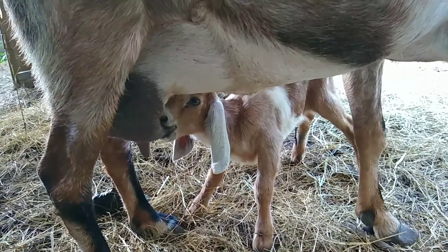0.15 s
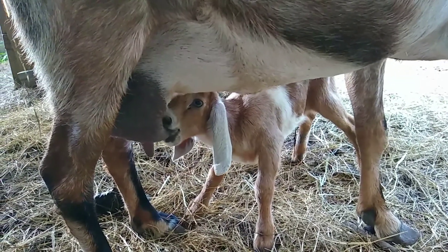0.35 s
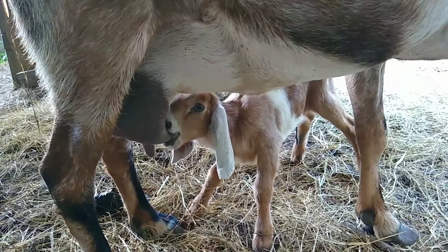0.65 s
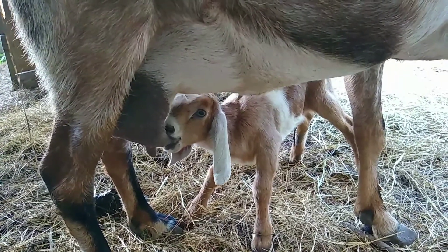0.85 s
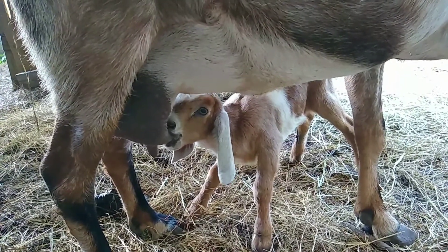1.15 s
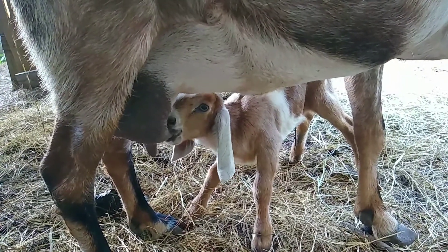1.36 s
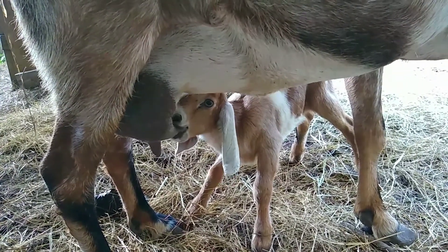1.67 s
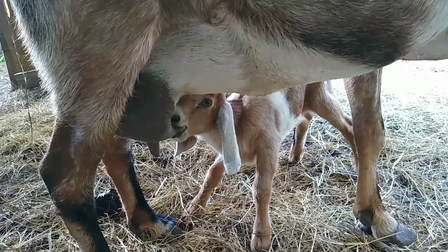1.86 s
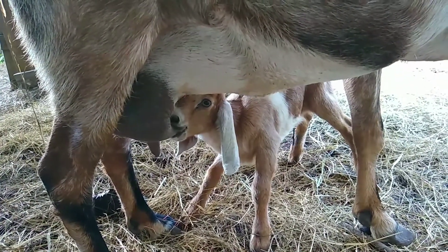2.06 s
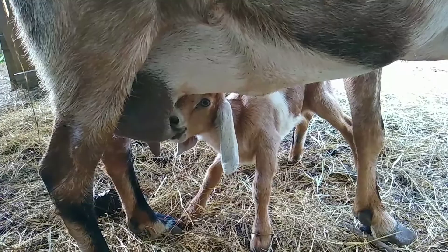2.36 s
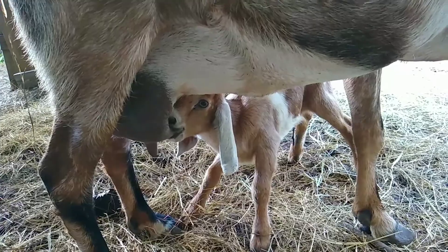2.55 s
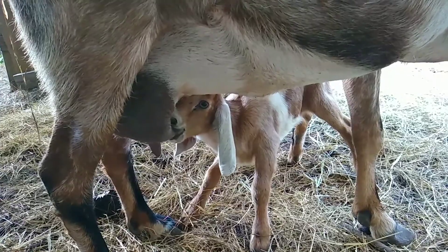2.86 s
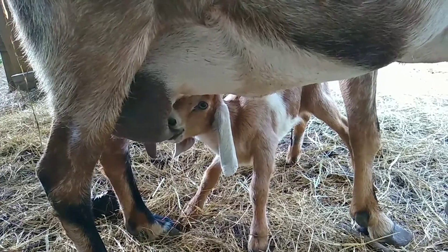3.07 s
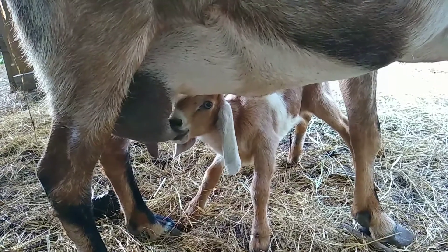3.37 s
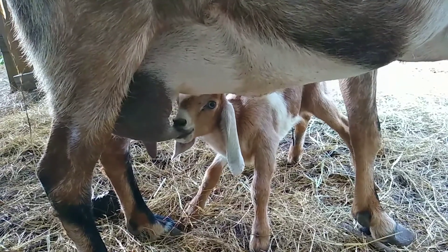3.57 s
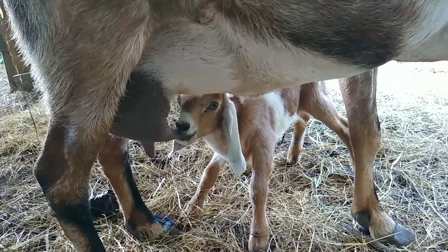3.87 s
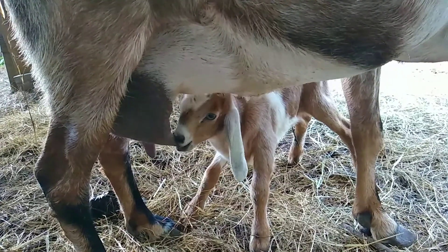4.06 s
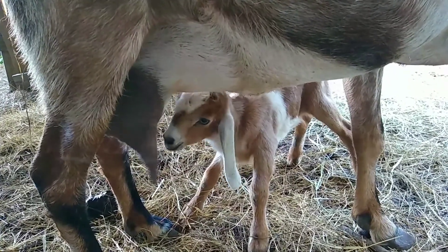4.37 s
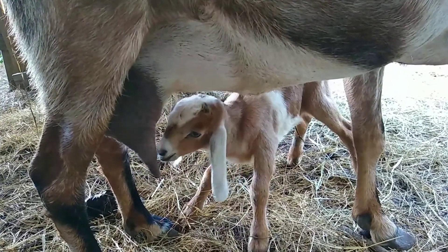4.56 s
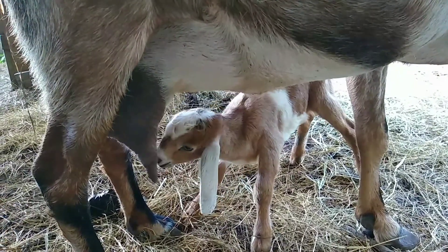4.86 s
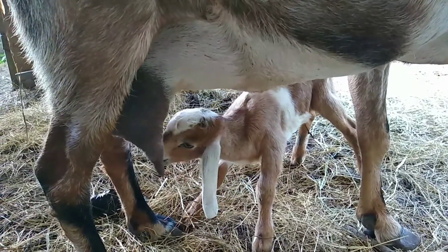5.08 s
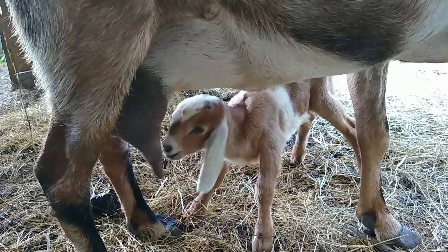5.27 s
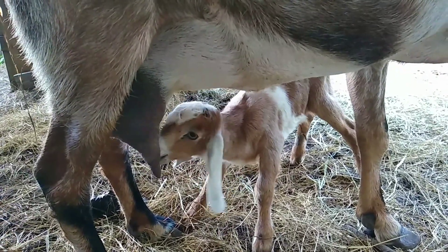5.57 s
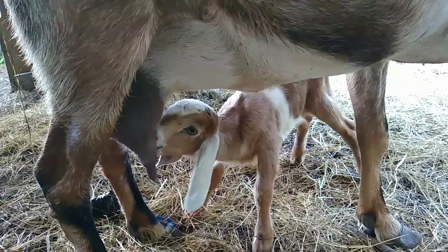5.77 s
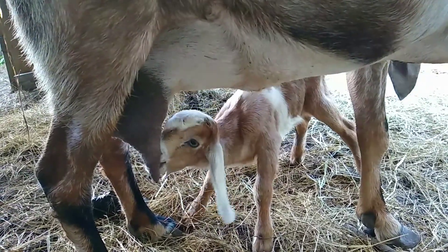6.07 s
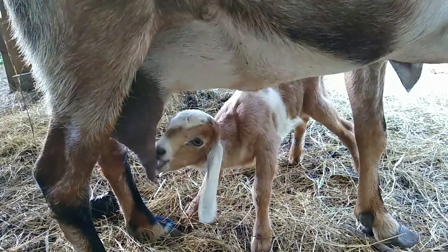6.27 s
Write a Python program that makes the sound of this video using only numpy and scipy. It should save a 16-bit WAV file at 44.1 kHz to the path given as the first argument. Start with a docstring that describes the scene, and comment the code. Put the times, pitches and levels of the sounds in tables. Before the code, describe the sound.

Near stereo microphones catch hooves shuffling and stalks snapping over very faint low air. The kid squeals high and harsh, its voice cracking into rasp; metal is bumped softly. After a calmer stretch of straw rustle, lip squeaks, gulps and two soft murmured bleats, it squeals again, shrill and wavering, over thudding, crunching straw. Short barn echoes follow the voice.

```python
"""A newborn goat kid nurses on straw in a barn: sucking squeaks, gulps and hooves in coloured noise.
At 1.35 s a shrill squeal: coupled tones mix into sum and difference tones and break up into a rasp.
A metal knock follows at 1.87 s (damped sines), then, amid sucking, two faint low bleats from 3.6 s (pulses
through throat and mouth resonances). From 5.7 s a second squeal; near 6.3 s a scuffle of thud and crunch
noise builds. Stirred straw and faint moving air (noise) run throughout; the barn echoes all but that air."""
import sys
import numpy as np
from scipy import signal
from scipy.fft import rfft, irfft, next_fast_len
from scipy.io import wavfile
from scipy.ndimage import map_coordinates

SR = 44100
rng = np.random.default_rng(int(sys.argv[2]) if len(sys.argv) > 2 else 0)


def int16_out(signal):
    """Quantize to a 16-bit WAV file."""
    q = np.round(np.clip(np.atleast_2d(signal).T, -1, 1) * 32767)
    wavfile.write(sys.argv[1], SR, q.astype(np.int16))


N = 283361
TIME = np.arange(N) / SR  # s

# Faint moving air. Each row: frequency in Hz, relative level in dB.
RUMBLE_HZ_DB = [(20, -41.5), (38, -32.5), (55, -16), (90, 1.0), (180, -3.5), (400, -14), (1500, -33)]
# Bedding stirred by the animals. Each row: time in seconds, shuffle level in dB, rustle level in dB.
STIR_S_DB = [(.25, -68, -70), (.5, -63, -67), (1.1, -58.5, -67.5), (1.6, -63, -62.5), (1.95, -54, -68),
             (2.25, -60.5, -64.5), (3.4, -60.5, -66.5), (4.6, -63.5, -69), (5.05, -65, -72.5),
             (5.4, -59, -70.5), (5.65, -60.5, -67), (6.0, -54.5, -59.5)]
# Noise spectra of straw and hooves. Each row: frequency in Hz, relative level in dB.
SHUFFLE_HZ_DB = [(15, -61), (25, -40), (78, -2.5), (124, -5.5), (168, 1), (221, -1.5), (324, -1),
                 (433, -3.5), (834, -4), (1250, -8.5), (1670, -7), (2060, -24), (2500, -46), (3250, -58),
                 (5500, -120)]
RUSTLE_HZ_DB = [(40, -20), (1200, 3.5), (1800, 11), (2200, -6), (2800, 5), (5700, 2), (7500, -17.5),
                (10000, -22.5), (15000, -19.5)]
CRACKLE_HZ_DB = [(1200, 3), (2200, -1), (2900, 11), (5700, 3), (7500, -16), (10000, -27), (15000, -17.5)]
CHAFF_HZ_DB = [(3000, -39.5), (7500, 3), (9000, -8.5), (10500, -0.5), (12000, -10), (13800, 3.5),
               (15500, -5.5)]
THUD_HZ_DB = [(30, -44.5), (60, -21.5), (180, 1.5), (400, 3.5), (800, -20.5), (2000, -63)]
CRUNCH_HZ_DB = [(40, -44.5), (250, -16), (800, 4.5), (1400, -1.5), (2200, -12.5), (5000, -50)]
# Closing scuffle: time half under way, build-up time, level.
SCUFFLE_S, SCUFFLE_RISE_S, SCUFFLE_DB = 6.305, 0.02, -34
# Steps and nudges in the straw. Each row: start in seconds, levels of thud, crunch, crackle and chaff
# in dB, rise time in seconds.
STEPS = [(.43, -68, -49, -54, -62, 0.0057), (0.556, -77, -52.5, -49, -58, 0.0013),
         (0.696, -59, -47.5, -51, -64.5, .008), (0.74, -58, -50, -53.5, -65, 0.0026),
         (0.863, -43, -41.5, -50, -66, 0.0021), (0.895, -40.5, -36, -56.5, -64, 0.0016),
         (0.948, -43, -50, -48.5, -67.5, 0.0055), (1.225, -53, -50.5, -54, -71, 0.00082),
         (1.255, -60, -45, -43.5, -56.5, 0.023), (1.279, -62, -44, -49, -61, .006),
         (1.874, -38, -41.5, -42, -48.5, 0.0027), (2.225, -47.5, -51.5, -57, -66.5, 0.0016),
         (2.494, -56, -55.5, -59.5, -73, 0.0014), (4.783, -50, -51.5, -60, -82, 0.0085),
         (5.229, -46, -59, -73, -80, 0.0018), (5.395, -56.5, -54, -64, -79, 0.0072),
         (5.688, -44, -44, -60.5, -76, 0.0079), (5.775, -53, -48, -56, -70.5, .002)]
KNOCK_S, KNOCK_DB = 1.873, -50
# Ringing metal. Each row: frequency in Hz, level in dB relative to KNOCK_DB, t60 in seconds.
METAL_MODES = [(3015, -5, .35), (5000, -18, .35), (5340, -14, .35), (5910, -6, .17), (7970, -17, .3),
               (14690, -3, .15)]
# Snaps of stalks and lips. Each row: start in seconds, level in dB, pitch in Hz.
SNAPS = [(0.431, -42, 2790), (0.444, -55, 11500), (0.483, -40.5, 3700), (.744, -45, 2900),
         (1.025, -32.5, 4200), (3.028, -53, 5480), (3.289, -42.5, 3300), (3.346, -46, 3050),
         (3.528, -51, 3400), (4.089, -48.5, 2600), (4.971, -53.5, 2580), (5.13, -55, 2600)]
# Snap spectrum. Each row: frequency in Hz, relative level in dB.
SNAP_HZ_DB = [(150, -15), (2000, -5.5), (3100, 1), (6000, -3.5), (9000, -19), (16000, -18.5)]
# Gulps and smacks of the muzzle. Each row: start in seconds, level in dB, pitch in Hz.
GULPS = [(.194, -35, 740), (2.46, -37.5, 258), (3.289, -34, 704), (3.528, -36.5, 800), (3.612, -36, 362),
         (4.052, -41.5, 196.5), (4.085, -38, 422), (4.274, -38, 460), (4.971, -40.5, 336),
         (5.129, -44, 357), (5.228, -40.5, 180), (5.947, -36.5, 258), (6.084, -37, 290)]
GULP_T60_PERIODS, GULP_TICK_DB = 12.1, -16  # tick relative to the gulp's level
# Sucking squeaks, then thin squeaks of the lips. Each row: centre in seconds, pitch in Hz, level in dB,
# length (between 1/e points) in seconds.
SUCKS = [(0.135, 853, -47, 0.05), (0.44, 815, -48.5, 0.061), (2.911, 833, -53, .09),
         (3.204, 782, -51, 0.06), (3.462, 841.6, -40, 0.0522), (3.734, 818, -44.5, 0.1)]
LIP_SQUEAKS = [(4.115, 3770, -62, 0.027), (5.008, 2900, -67, .015), (5.158, 2910, -62, 0.024),
               (5.335, 3060, -61, 0.025)]
# Glide through a squeak and lift at its strongest, as shares of the pitch.
SUCK_RISE, SUCK_ARCH = 0.056, 0.094
LIP_RISE, LIP_ARCH = -0.039, 0.06
# Soft bleats, one list per call. Each row: time in seconds, pitch in Hz, level in dB, lower and upper
# mouth resonance in Hz, roughness from 0 to 1.
SOFT_BLEATS = [
    [(3.58, 183.1, -59, 1350, 1650, 0.66), (3.65, 192, -51, 1430, 1740, 0.57),
     (3.69, 205, -56.5, 1050, 1610, 0.53), (3.73, 234.2, -51, 1100, 1520, 0.36),
     (3.78, 240.5, -48.5, 1170, 1550, 0.18), (3.87, 235, -47.5, 1420, 1890, 0.17),
     (3.93, 215.5, -49.5, 1330, 1760, 0.47), (3.96, 194.2, -54.5, 1280, 1700, 0.53),
     (3.995, 190.5, -67, 1280, 1650, .8)],
    [(4.22, 189.3, -61.5, 1400, 1650, 0.78), (4.29, 205.7, -50, 1390, 1810, 0.81),
     (4.33, 216, -50, 1330, 1800, 0.16), (4.39, 224.2, -51.5, 1340, 1950, 0.28),
     (4.43, 221.8, -52, 1350, 1750, 0.65), (4.46, 224, -64, 1350, 1370, 0.45),
     (4.51, 222, -66, 1340, 1326, .2)],
]
# Throat response. Each row: frequency in Hz, relative level in dB.
THROAT_HZ_DB = [(100, -31), (225, 4), (450, 1), (680, -8), (1200, -0.5), (1750, 1), (2500, -9), (3100, -8),
                (3650, -1.5), (4000, -2.5), (4700, -13), (5700, -5), (6700, -34.5), (7600, -11.5),
                (10000, -59)]
DULL_PER_KHZ = 0.29  # dB of treble lost per kHz, per dB that a soft bleat weakens
# Main tone of each squeal. Each row: time in seconds, pitch in Hz, level in dB.
SQUEAL_1 = [(1.365, 3150, -53), (1.41, 3220, -47.5), (1.44, 3200, -51.5), (1.452, 3200, -30),
            (1.478, 3170, -36.5), (1.5, 3015, -31.5), (1.55, 3140, -32.5), (1.574, 2930, -25),
            (1.597, 3130, -20.5), (1.604, 3150, -28.5), (1.63, 3190, -25.5), (1.656, 3023, -16),
            (1.672, 3012, -18), (1.684, 3100, -25), (1.69, 3400, -31.5), (1.712, 3300, -34.5),
            (1.722, 2885, -22.5), (1.732, 2830, -33), (1.744, 2740, -35.5), (1.752, 2790, -18.5),
            (1.764, 3014, -19), (1.78, 3020, -26.5), (1.792, 3250, -30.5), (1.803, 3330, -39)]
SQUEAL_2 = [(5.83, 3030, -40.5), (5.848, 3137, -29.5), (5.872, 3200, -22), (5.888, 3117, -32.5),
            (5.9, 2993, -24), (5.912, 3020, -28), (5.93, 3026, -28), (5.95, 3280, -23),
            (5.975, 3118, -29.5), (6.015, 3182, -30.5), (6.038, 3105, -35.5), (6.058, 3163, -22.5),
            (6.08, 3181, -22.5), (6.088, 3400, -37), (6.115, 3360, -32.5), (6.124, 3110, -29),
            (6.143, 2970, -25), (6.152, 3042, -32.5), (6.165, 3170, -17.5), (6.187, 3400, -31.5),
            (6.24, 3382, -27), (6.256, 3165, -25.5), (6.276, 3140, -34.5), (6.29, 3078, -22.5),
            (6.303, 3160, -24), (6.31, 3380, -36), (6.35, 3480, -34.5), (6.372, 3592, -24.5),
            (6.425, 3540, -33.5)]
# Strain of the voice in each squeal. Each row: time in seconds, roughness from 0 to 1.
STRAIN_1 = [(1.36, .03), (1.48, .05), (1.51, .14), (1.595, .17), (1.612, .8), (1.635, .6), (1.65, .16),
            (1.68, .16), (1.695, .85), (1.712, .7), (1.722, .2), (1.738, .55), (1.755, .1), (1.775, .2),
            (1.8, .55)]
STRAIN_2 = [(5.88, .08), (5.915, .28), (5.98, .07), (6.07, .04), (6.14, .16), (6.18, .1), (6.21, .3),
            (6.29, .15), (6.33, .5), (6.37, .3), (6.42, .55)]
# Second tone under the main one, early in the first squeal. Each row: time in seconds, pitch in Hz,
# level in dB.
SECOND_TONE = [(1.385, 2810, -50), (1.4, 2555, -34.5), (1.428, 2420, -34), (1.445, 2520, -45),
               (1.47, 2704, -46), (1.56, 2770, -42)]
# High whistles over the main tone, low undertones beneath it. Each row: start in seconds, hold in seconds,
# pitch in Hz, level in dB, scoop as a share of the pitch.
WHISTLES = [(1.351, 0.22, 4510, -20.5, 0.028), (1.6, 0.11, 4190, -38.5, .05),
            (1.702, 0.014, 4590, -22.5, .05), (5.703, 0.024, 4428, -29.5, .12), (5.82, 0.015, 3980, -32, 0),
            (6.192, 0.054, 4440, -38.5, .02), (6.312, .035, 4640, -29.5, 0)]
UNDERTONES = [(1.368, 0.061, 1250, -46.5, 0), (1.449, 0.017, 1295, -18.5, .02),
              (1.5, 0.11, 1409, -29.5, .05), (1.617, 0.039, 1294, -25.5, 0.06),
              (1.717, 0.026, 1402, -30, 0.061), (5.836, 0.013, 913, -30, 0), (5.878, 0.0055, 902.5, -40, 0),
              (6.198, 0.019, 1049, -24, 0.00099), (6.242, 0.02, 1188, -27.5, .1),
              (6.314, 0.042, 1249, -22, .03)]
ATTACK_S, RELEASE_DB_PER_S, SCOOP_S = .006, 750, .013  # attack and scoop are time constants
# Each row: how many times whistle, main tone, undertone and second tone enter a partial.
PARTIAL_ORDERS = [(1, 0, 0, 0), (0, 1, 0, 0), (0, 0, 1, 0), (0, 0, 0, 1), (2, 0, 0, 0), (3, 0, 0, 0),
                  (0, 2, 0, 0), (0, 3, 0, 0), (0, 4, 0, 0), (0, 5, 0, 0), (1, 1, 0, 0), (1, 0, 1, 0),
                  (0, 1, -1, 0), (2, 1, 0, 0), (2, 0, 1, 0), (1, 0, 0, 1), (1, 0, 0, -1), (3, 0, 0, -1),
                  (4, 0, 0, -1)]
# Strength of those partials in each squeal, in dB relative to the tones that form them.
PARTIALS_1_DB = [-1.5, 0.5, -1.5, -1.5, -43.5, -23.5, -18, -44.5, -42, -42, -19.5, -22.5, -17.5, -35.5,
                 -32.5, -15, -21, -36, -41.5]
PARTIALS_2_DB = [-1.5, 0.5, -1.5, 0, -54, -32, -16.5, -32, -25.5, -35, -24, -16, -22.5, -36, -18.5]
# One value each for whistle, main tone, undertone and second tone: pitch shake at full strain in Hz,
# pitch flutter without strain in Hz, level where overtones and mixed tones stop growing in dB.
SHAKE_HZ = [90, 230, 230, 230]
FLUTTER_HZ = [8, 12, 25, 30]
SATURATION_DB = [-19, -29.5, -23, -35.5]
# Rasp spectrum. Each row: frequency in Hz, relative level in dB.
RASP_HZ_DB = [(200, -44), (600, -4.5), (850, 7), (1300, 4.5), (2000, -6.5), (2600, -1.5), (3200, 2.5),
              (4000, -6.5), (5000, 6), (6200, -7), (7300, 1.5), (8400, -21.5), (14000, -18), (16000, -31.5)]
RASP_1_DB, RASP_2_DB = -7.5, -2  # at full strain, relative to the tones of each squeal
RASP_POWER = 1.15  # exponent of the strain
# Echoes from the mother's flank, the wall and the roof. Each row: delay in seconds, level in dB.
ECHOES = [(.0085, -20), (.017, -15), (.026, -17)]
# Decay of the barn. Each row: frequency in Hz, t60 in seconds.
BARN_HZ_T60 = [(150, 0.71), (1000, 0.34), (3000, 0.21), (8000, 0.12), (15000, 0.12)]
# Channel balance. Each row: frequency in Hz, left minus right in dB.
LEFT_LEAD_HZ_DB = [(60, -5.5), (150, 8), (300, 4), (700, 1.5), (1300, 1), (3000, 4.5), (4400, -1),
                   (6200, 1.5), (9500, 6.5), (14000, 3)]
TOP_HZ = 15700


def amp(db):
    """Decibels to gain."""
    return 10 ** (np.asarray(db) / 20)


def unit(x):
    """Scale to rms 1."""
    return x / np.sqrt(np.mean(x ** 2) + 1e-20)


def along(points, hz):
    """Interpolate (Hz, value) points on a log frequency axis."""
    f, v = np.transpose(points)
    return np.interp(np.log(hz + 1), np.log(f + 1), v)


def curves(rows):
    """One value per sample for each column after the time."""
    s, *cols = np.transpose(rows)
    return [np.interp(TIME, s, c) for c in cols]


def gate(rows):
    """Open while a table lasts, with short fades outside it."""
    start_s, end_s = rows[0][0], rows[-1][0]
    return np.interp(TIME, [start_s - .006, start_s, end_s, end_s + .01], [0, 1, 1, 0])


def wobble(rate_hz, times=TIME):
    """Smooth random curve through rate_hz knots a second."""
    knots = rng.standard_normal(int(len(times) * rate_hz / SR) + 4)
    return map_coordinates(knots, [times * rate_hz])


def filtered(x, response):
    """Multiply the spectrum of x by a response of frequency."""
    m = next_fast_len(N + 8192)
    hz = np.fft.rfftfreq(m, 1 / SR)
    return irfft(rfft(x, m) * response(hz), m)[..., :N]


def coloured(x, spectrum):
    """x through a (Hz, dB) spectrum, at rms 1."""
    return unit(filtered(x, lambda hz: amp(along(spectrum, hz))))


def noise(spectrum, grain_db):
    """Coloured noise in tiny uneven grains."""
    return coloured(rng.standard_normal(N) * amp(grain_db * wobble(450)), spectrum)


def bursts(times, levels_db, t60, rise):
    """Envelope of blows that rise (one rise time for all, or one each) and decay exponentially."""
    envelope, t = np.zeros(N + SR), TIME[:SR // 2]
    for s, db, rise_s in zip(times, levels_db, np.broadcast_to(rise, len(times))):
        blow = amp(db - 60 * t / t60) * (1 - np.exp(-t / rise_s))
        envelope[round(s * SR):][:len(t)] += blow
    return envelope[:N]


def rumble():
    """Faint moving air: low noise, independent at each microphone."""
    return amp(-67.0) * np.array([coloured(rng.standard_normal(N), RUMBLE_HZ_DB) for _ in "LR"])


def bedding():
    """Straw friction: steady, swelling noise under the animals, louder in the closing scuffle."""
    shuffle_db, rustle_db = curves(STIR_S_DB)
    shuffle = amp(shuffle_db + 2.6 * wobble(15)) * noise(SHUFFLE_HZ_DB, grain_db=2.5)
    rustle = amp(rustle_db + 0.79 * wobble(29)) * noise(RUSTLE_HZ_DB, grain_db=2)
    build = (1 + np.tanh((TIME - SCUFFLE_S) / SCUFFLE_RISE_S / 2)) / 2
    blend = 0.57 * noise(THUD_HZ_DB, grain_db=0.5) + 1.1 * noise(CRUNCH_HZ_DB, grain_db=2)
    return shuffle + rustle + amp(SCUFFLE_DB) * build * blend


def steps():
    """A hoof lands or slides: ground thuds, bedding crunches, top stalks crackle, chaff is brushed."""
    s, thud_db, crunch_db, crackle_db, chaff_db, rise_s = np.transpose(STEPS)
    thud = bursts(s, thud_db, t60=0.13, rise=rise_s) * noise(THUD_HZ_DB, grain_db=4)
    crunch = bursts(s, crunch_db, t60=0.19, rise=rise_s) * noise(CRUNCH_HZ_DB, grain_db=2.0)
    crackle = bursts(s, crackle_db, t60=0.16, rise=rise_s) * noise(CRACKLE_HZ_DB, grain_db=4.0)
    chaff = bursts(s, chaff_db, t60=0.17, rise=rise_s) * noise(CHAFF_HZ_DB, grain_db=4)
    return thud + crunch + crackle + chaff


def knock():
    """Bumped metal rings faintly in damped modes."""
    t = np.maximum(TIME - KNOCK_S, 0)
    ring = sum(amp(db - 60 * t / t60) * np.sin(2 * np.pi * hz * t) for hz, db, t60 in METAL_MODES)
    return amp(KNOCK_DB) * (1 - np.exp(-t / .004)) * ring


def snaps():
    """Each snap is a very short crack, strongest around its own pitch."""
    out, crack = np.zeros(N), coloured(rng.standard_normal(N), SNAP_HZ_DB)
    for s, db, hz in SNAPS:
        ring = unit(signal.lfilter(*signal.iirpeak(hz, 4, SR), crack))  # Q 4
        out += bursts([s], [db], t60=0.01, rise=0.0005) * (0.74 * ring + .5 * crack)
    return out


def gulps():
    """Each gulp starts with a wet tick and rings one quickly damped resonance."""
    s, level_db, _ = np.transpose(GULPS)
    out = bursts(s, level_db + GULP_TICK_DB, t60=.025, rise=.0008) * noise(CRUNCH_HZ_DB, grain_db=2)
    for s, db, hz in GULPS:
        envelope = bursts([s], [db], t60=GULP_T60_PERIODS / hz, rise=0.0014)
        out += envelope * np.sin(2 * np.pi * hz * (TIME - s))
    return out


def squeaks(rows, rise, arch):
    """Air slips past wet teat or lips in short, fuzzy squeaks that glide and lift at their strongest."""
    out = np.zeros(N)
    fuzz_hz = 80 * wobble(700)
    for s, hz, db, length_s in rows:
        progress = 2 * (TIME - s) / length_s
        swell = np.exp(-progress ** 2)
        pitch_hz = hz * (1 + rise * np.tanh(progress) + arch * (swell - 1))
        phase = 2 * np.pi * np.cumsum(pitch_hz + fuzz_hz) / SR
        out += amp(db) * swell * (np.sin(phase) + 0.18 * np.sin(2 * phase))
    return out * amp(2.34 * wobble(200))


def soft_bleats():
    """Vocal fold pulses and hoarse air through a short throat and a moving mouth; weaker means duller."""
    voice = np.zeros(N)
    for rows in SOFT_BLEATS:
        opening = gate(rows)
        live = opening > 0
        hz, db, lower_hz, upper_hz, rough = np.array(curves(rows))[:, live]
        jitter = .06 * rough * wobble(260)[live]
        phase = 2 * np.pi * np.cumsum(hz * (1 + jitter)) / SR
        k = np.arange(1, 40)[:, None]  # harmonic numbers
        partial_db = along(THROAT_HZ_DB, k * hz) + DULL_PER_KHZ * (db - db.max()) * k * hz / 1000
        for centre_hz, height_db, half_width_hz in [(lower_hz, 8, 89), (upper_hz, 9.5, 130)]:
            partial_db += height_db / (1 + ((k * hz - centre_hz) / half_width_hz) ** 2)
        partial_db += 2.5 * np.array([wobble(28, TIME[:live.sum()]) for _ in k])
        start_phase = rng.uniform(0, 2 * np.pi, k.shape)
        pulses = unit(np.sum(amp(partial_db) * np.sin(k * phase + start_phase), axis=0))
        air = .6 * rough * noise(THROAT_HZ_DB, grain_db=2)[live] * (1 + np.cos(phase))
        level_db = db + 3 * rough * wobble(70)[live]
        voice[live] += amp(level_db) * opening[live] * (pulses + air)
    return voice


def glide(rows):
    """Pitch (Hz) and level (dB) of a tone that follows a curve, silent outside it."""
    hz, db = curves(rows)
    return hz, db + 20 * np.log10(gate(rows) + 1e-30)


def side_tone(rows):
    """Pitch (Hz) and level (dB) of a tone that cuts in, scoops up to its pitch, holds and fades."""
    hz, gain = np.full(N, float(rows[0][2])), np.zeros(N)
    for s, hold_s, pitch_hz, db, scoop in rows:
        on = TIME >= s
        t = TIME[on] - s
        hz[on] = pitch_hz * (1 - scoop * np.exp(-t / SCOOP_S))
        fade_db = RELEASE_DB_PER_S * np.maximum(t - hold_s, 0)
        gain[on] += amp(db - fade_db) * (1 - np.exp(-t / ATTACK_S)) ** 2
    return hz, 20 * np.log10(gain + 1e-30)


def squeal(main, strain, side_tones, partials_db, rasp_db):
    """Coupled tones make sum and difference tones; strain shakes them and adds a rasp of air."""
    live = (TIME > main[0][0] - .2) & (TIME < main[-1][0] + .1)
    rough = curves(strain)[0][live]
    whistle, undertone, second = side_tones
    tones = [whistle, glide(main), undertone, second]
    phases, levels_db, power = [], [], 0
    for (hz, db), flutter_hz, shake_hz in zip(tones, FLUTTER_HZ, SHAKE_HZ):
        shake = shake_hz * rough * wobble(650)[live] + flutter_hz * wobble(160)[live]
        shimmer_db = 5 * rough * wobble(380)[live] + 1.2 * wobble(110)[live]
        shimmer_db = 6 * np.tanh(shimmer_db / 6)  # stays within 6 dB
        phases.append(2 * np.pi * np.cumsum(hz[live] + shake) / SR)
        levels_db.append(db[live] + shimmer_db)
        power = power + amp(db[live]) ** 2
    levels_db, phases = np.array(levels_db), np.array(phases)
    saturated_db = np.minimum(levels_db, np.array(SATURATION_DB)[:, None])
    voice = np.zeros(N)
    for orders, db in zip(np.array(PARTIAL_ORDERS), partials_db):
        parents = np.abs(orders)
        if parents.sum() == 1:
            level_db = parents @ levels_db
        else:  # overtone or mixed tone: mean level of its parents
            level_db = parents @ saturated_db / parents.sum() + 3 * wobble(55)[live]
        voice[live] += np.sqrt(2) * amp(db + level_db) * np.sin(orders @ phases)
    rasp_gain = amp(rasp_db) * np.sqrt(power) * rough ** RASP_POWER
    voice[live] += rasp_gain * noise(RASP_HZ_DB, grain_db=5.0)[live]
    return voice


def echoed(x):
    """Near surfaces repeat the voice; on gliding tones the copies beat against it."""
    return x + sum(amp(db) * np.interp(TIME - delay, TIME, x, left=0) for delay, db in ECHOES)


def barn(x, apart):
    """Decaying noise tails, treble dying sooner; apart sets how far the two channels differ."""
    hz, t, z = signal.stft(rng.standard_normal((2, SR // 2)), SR, nperseg=256)
    decay = amp(-60 * t / along(BARN_HZ_T60, hz)[:, None])
    common, own = signal.istft(z * decay, SR, nperseg=256)[1]
    tails = np.array([common + apart * own, common - apart * own]) / np.linalg.norm(common)
    return signal.fftconvolve(x[None], tails, axes=1)[:, :N]


def ports(x, lag_s):
    """Above the low mids the left channel trails the right by lag_s."""
    def response(hz):
        turn = np.pi * hz * lag_s * np.clip((hz - 1300) / 400, 0, 1)
        return np.exp(1j * np.outer([-1, 1], turn))
    return filtered(x, response)


def scene():
    """Voices and small noises, close by, with a little of the barn."""
    side_tones = side_tone(WHISTLES), side_tone(UNDERTONES), glide(SECOND_TONE)
    first = amp(-1.0) * squeal(SQUEAL_1, STRAIN_1, side_tones, PARTIALS_1_DB, RASP_1_DB)
    second = amp(-2.0) * squeal(SQUEAL_2, STRAIN_2, side_tones, PARTIALS_2_DB, RASP_2_DB)
    voice = echoed(first + second)
    nursing = squeaks(SUCKS, SUCK_RISE, SUCK_ARCH) + squeaks(LIP_SQUEAKS, LIP_RISE, LIP_ARCH) + gulps()
    small = soft_bleats() + nursing
    small = small + steps() + snaps() + knock() + bedding()
    air = voice + small + amp(-9.5) * barn(voice, apart=0.75) + amp(-10) * barn(small, apart=1.0)
    return ports(air, lag_s=15 / SR) + rumble()


def record(dry):
    """Two microphones: left is louder in most bands; nothing is kept above TOP_HZ."""
    def response(hz):
        balance_db = np.outer([.5, -.5], along(LEFT_LEAD_HZ_DB, hz))
        return amp(balance_db) * (hz < TOP_HZ)
    return filtered(dry, response)


dry = scene()
out = record(dry)
int16_out(out)
```